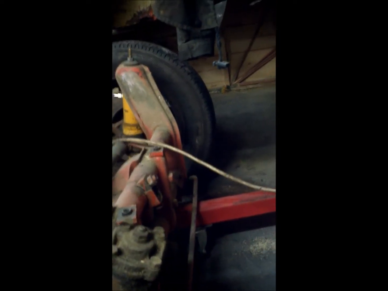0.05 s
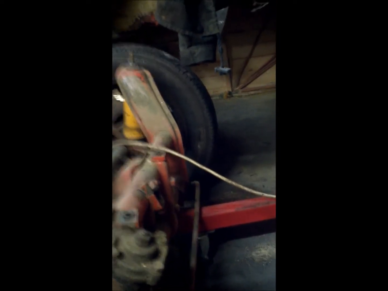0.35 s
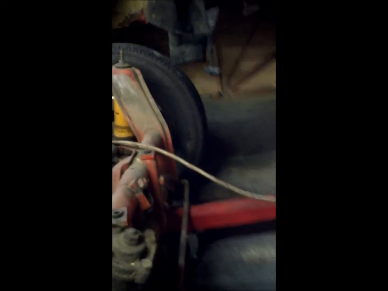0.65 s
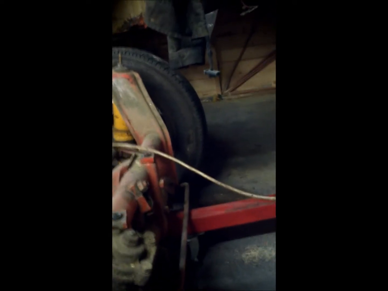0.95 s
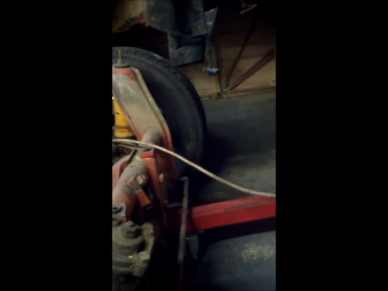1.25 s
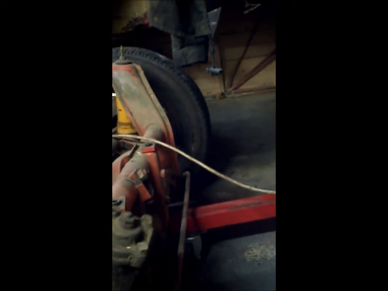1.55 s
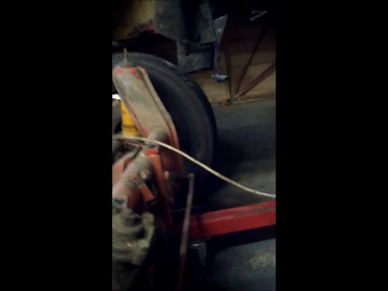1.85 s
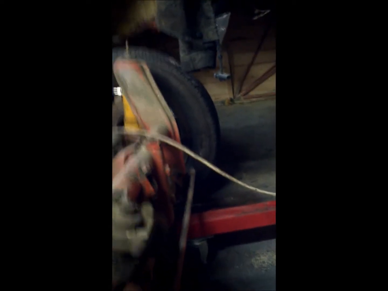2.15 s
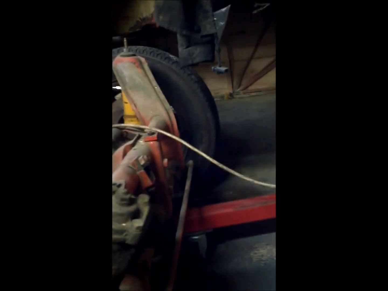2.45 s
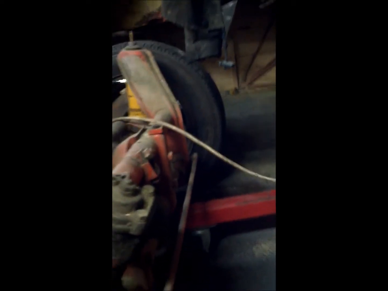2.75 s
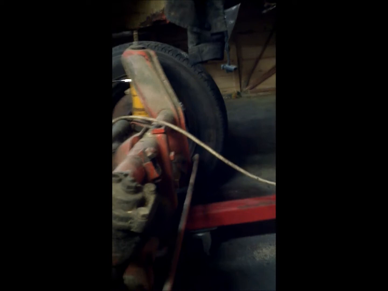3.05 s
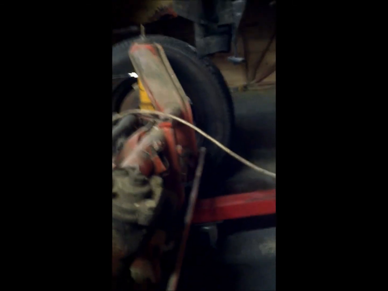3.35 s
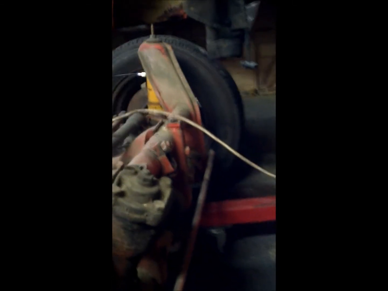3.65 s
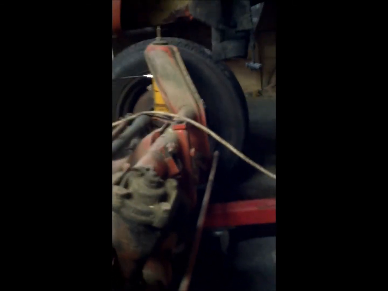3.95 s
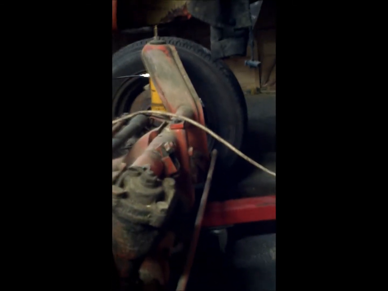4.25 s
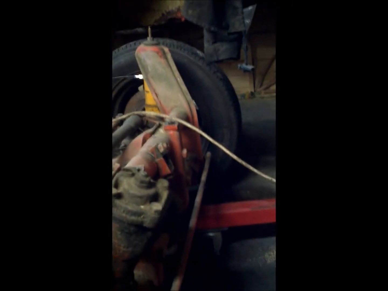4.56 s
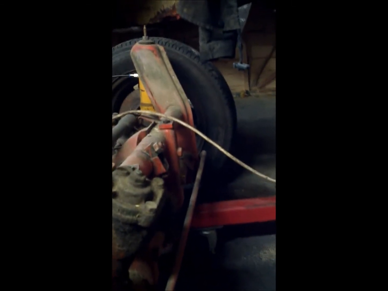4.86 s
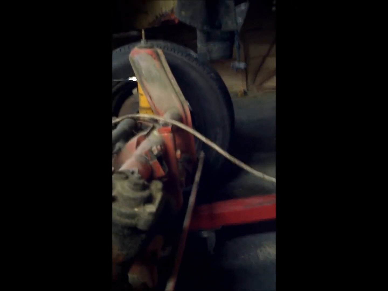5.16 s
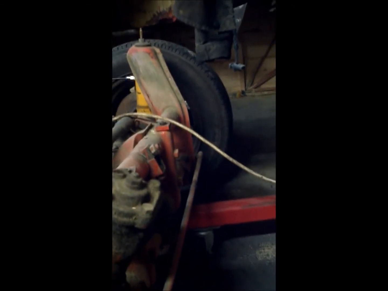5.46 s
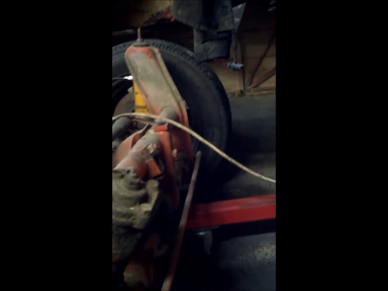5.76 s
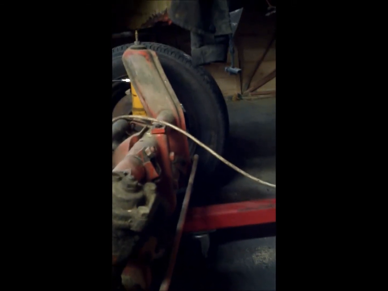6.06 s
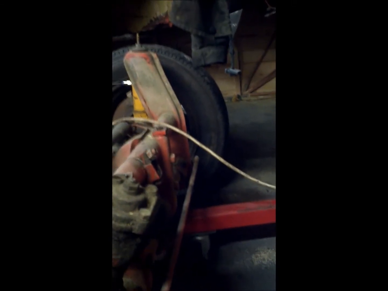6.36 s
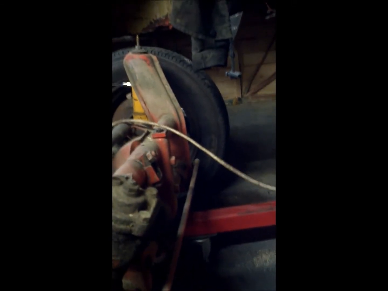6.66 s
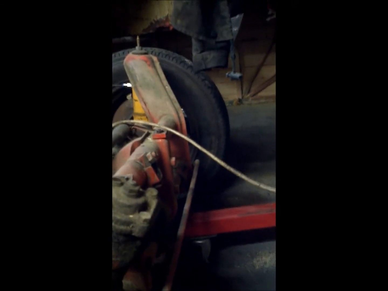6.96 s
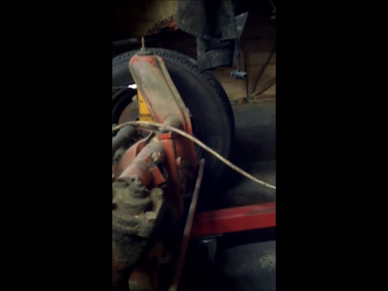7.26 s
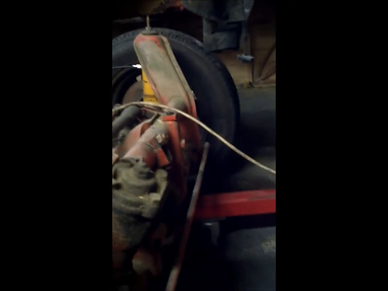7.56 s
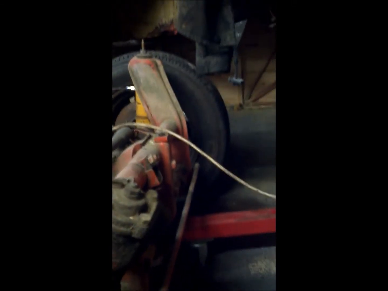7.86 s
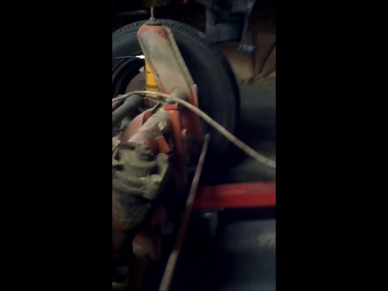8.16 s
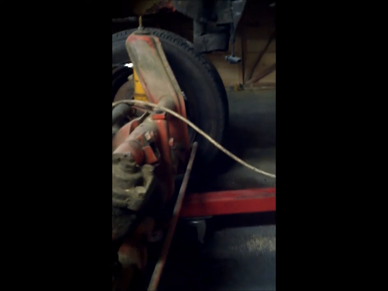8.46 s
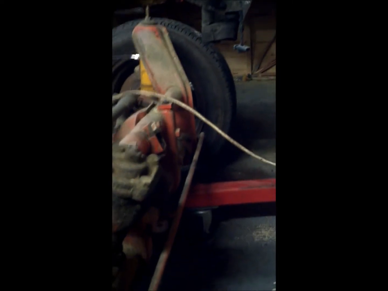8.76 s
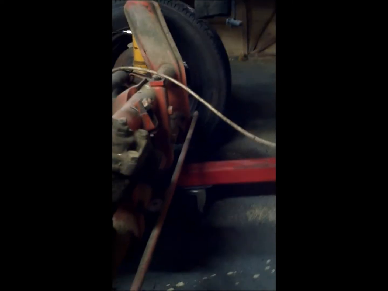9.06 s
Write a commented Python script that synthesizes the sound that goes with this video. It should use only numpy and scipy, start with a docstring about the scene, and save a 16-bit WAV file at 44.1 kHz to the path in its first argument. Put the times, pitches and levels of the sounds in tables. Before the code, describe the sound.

Compressed air suddenly starts rushing through a hose and valve in a garage, a bright, steady hiss with a faint wavering whistle. It eases a little, then the valve snaps shut with a sharp click, leaving a softer leak. Fittings knock lightly and the hose scrapes faintly over metal before a short, loud blast ends the flow. The microphone is close.

```python
"""A faint hiss, then a sudden rush of compressed air through a hose and valve in a garage.
The swirling air hisses, and whistles over an edge in the valve while it is forceful. It eases off,
then the valve snaps shut with a sharp click, leaving a softer leak. The hose scrapes over metal,
fittings knock, and a last blast escapes. A phone close by makes stereo from two microphone openings."""
import sys
import numpy as np
from scipy import signal
from scipy.fft import rfft, irfft, next_fast_len
from scipy.io import wavfile
from scipy.ndimage import map_coordinates

SR = 44100
rng = np.random.default_rng(int(sys.argv[2]) if len(sys.argv) > 2 else 0)


def transcribe(signal):
    """Save signal, clipped to [-1, 1], as a 16-bit WAV file at the path in sys.argv[1]."""
    frames = np.atleast_2d(signal).T
    limited = np.clip(frames, -1, 1)
    pcm = np.round(limited * 32767).astype(np.int16)
    wavfile.write(sys.argv[1], SR, pcm)


N = 411012
# The valve opens, eases off, snaps shut and is forced again; then the jet stops.
OPEN_S, EASE_S, SHUT_S, FORCE_S, STOP_S = .524, 4.51, 7.375, 9.1, 9.29


def amp(db):
    """Turn decibels into a number to multiply a sound by."""
    return 10 ** (np.asarray(db) / 20)

def clock():
    """The time of every sample, in seconds."""
    return np.arange(N) / SR

def along(points, hz):
    """Read between (frequency, value) points, giving each octave equal room."""
    freqs, values = np.transpose(points)
    return np.interp(np.log(hz + 1), np.log(freqs + 1), values)

def curves(rows):
    """Join a table's rows with straight lines: one curve for each column after the time."""
    times, *columns = np.transpose(rows)
    return [np.interp(clock(), times, column) for column in columns]

def gate(start, end, edge):
    """1 from start to end and 0 outside, with slopes lasting edge seconds."""
    return np.clip(np.minimum(clock() - start, end - clock()) / edge + .5, 0, 1)

def wobble(rate):
    """A smooth curve through rate random values a second."""
    t = clock()
    coarse = t[::32]
    values = rng.standard_normal(int(N * rate / SR) + 4)
    return np.interp(t, coarse, map_coordinates(values, [coarse * rate], order=2))

def add(track, start, sound):
    """Mix a sound into a track, start seconds in."""
    slot = track[..., round(start * SR):][..., :sound.shape[-1]]
    slot += sound[..., :slot.shape[-1]]

def filtered(x, response):
    """Scale and delay each frequency of x as response(hz) says."""
    size = next_fast_len(N + 2048, True)
    return irfft(rfft(x, size) * response(np.fft.rfftfreq(size, 1 / SR)), size)[..., :N]

def resonances(modes, hz):
    """How strongly an object answers each frequency, given the pitches it rings at."""
    return np.sqrt(sum(amp(db) ** 2 * (hz * width) ** 2 / ((pitch ** 2 - hz ** 2) ** 2 + (hz * width) ** 2)
                       for pitch, width, db in modes))

# Stereo width, the two openings' difference against their sum: f/Hz, level/dB
STEREO_WIDTH = [(100, 7), (500, 4), (1000, 2), (2500, 2), (4500, 0), (6000, -3), (8500, -4.5), (12000, -4),
                (15000, -3.5)]
def noise(gain, wide_db=0):
    """Noise shaped by gain(hz) at both openings; the part they share has an average (rms) size of 1."""
    grid = np.fft.rfftfreq(8192, 1 / SR)
    gains = gain(grid), gain(grid) * amp(along(STEREO_WIDTH, grid) + wide_db)
    white = rng.standard_normal((2, N))
    mid, side = filtered(white, lambda hz: np.array([np.interp(hz, grid, g) for g in gains]))
    return np.array([mid + side, mid - side]) / np.std(mid)

def smooth_noise(colour, wide_db=0):
    """Noise with a smooth tone colour: a table of how strong each frequency is."""
    return noise(lambda hz: amp(along(colour, hz)), wide_db)


# Loudness of the low rush of air and garage: t/s, level/dB
RUSH_LEVELS = [(0.45, -65), (0.7, -61), (1.05, -65), (2.6, -55.5), (4.1, -53.5), (5.2, -54.5), (6.5, -53),
               (7.3, -52.5), (7.5, -61), (8.45, -52.5), (8.75, -57), (9.2, -55.5)]
# Tone colour of that rush: f/Hz, level/dB
RUSH_COLOUR = [(30, -33), (60, -30), (105, -1), (280, 3.5), (500, 1), (900, -2.5), (1500, -2.5), (2200, -4),
               (5000, -47), (9000, -42)]
# Tone colour of seeping air: f/Hz, level/dB
SEEP_COLOUR = [(100, -25), (2000, -15.5), (3000, -15), (5000, -2.5), (6400, 1.5), (8000, -4), (12000, -2),
               (14500, -3), (15500, 4)]
# Tone colour of rumble and dull thumps: f/Hz, level/dB
THUMP_COLOUR = [(30, -16), (65, -2), (115, 6), (190, 0), (400, -17), (1500, -36)]
def background():
    """A low rush, air always seeping from the line, and the lumpy rumble of the hand on the phone."""
    rush_db, = curves(RUSH_LEVELS)
    rumble_db = -67.5 + 1.3 * (rush_db - rush_db.mean())
    rush = amp(rush_db + 0.8 * wobble(16)) * smooth_noise(RUSH_COLOUR)
    seep = amp(-46) * smooth_noise(SEEP_COLOUR)
    rumble = amp(rumble_db + 3.5 * wobble(12)) * smooth_noise(THUMP_COLOUR, wide_db=-20)
    return rush + seep + rumble

# Slides of the hose: t/s, length/s, level/dB
HOSE_SLIDES = [(5.9, 0.95, -61), (7.886, 0.83, -55.5)]
def scrapes(ring_hz=1410, width_hz=450, rough_db=1):
    """The hose slips unevenly over metal: each stroke swells and fades around one broad pitch."""
    strokes = np.zeros(N)
    for start, length, db in HOSE_SLIDES:
        add(strokes, start, amp(db) * np.sin(np.linspace(0, np.pi, round(length * SR))))
    rub = noise(lambda hz: resonances([(ring_hz, width_hz, 0)], hz) ** 2)
    return strokes * amp(rough_db * wobble(60)) * rub

# Pitches the fittings ring at: f/Hz, width/Hz, level/dB
FITTING_RINGS = [(238, 190, 6.5), (487, 54, 0), (860, 330, -20.5), (1480, 640, -2)]
# Each knock, and at 7.3722 s the low body of the valve's snap: t/s, level/dB, fade/s (the time to fall by 60
# dB), thump level/dB
FITTING_KNOCKS = [(2.528, -44, .25, -48), (2.744, -43, .05, -60), (2.953, -46, .14, -47),
                  (4.493, -52, .12, -62), (6.63, -50, .15, -50), (7.3722, -32, .005, -52),
                  (7.59, -62, .1, -53), (7.8052, -37.5, .045, -32), (8.136, -51, .1, -62),
                  (8.38, -49, .12, -60), (8.412, -48, .08, -62)]
def knocks():
    """Hose and fittings knock: a brief hard contact, a longer scuff and a low thump. One short row instead
    gives the valve's snap its low body."""
    scuff, thump = np.zeros((2, N))
    t = np.arange(SR // 4) / SR
    contact = 1 + 1.3 * amp(-60 * t / .025)
    for start, db, fade_s, thump_db in FITTING_KNOCKS:
        add(scuff, start, amp(db - 60 * t / fade_s) * contact)
        add(thump, start, amp(thump_db - 60 * t / .14))
    fitting = noise(lambda hz: resonances(FITTING_RINGS, hz) / np.hypot(1, hz / 3500))
    return scuff * fitting + thump * smooth_noise(THUMP_COLOUR, wide_db=-17)

# The open valve's high fizz and the hiss of its narrow throat: t/s, fizz level/dB, throat level/dB
OPEN_LEVELS = [(0.53, -31, -32), (0.6, -40.5, -32.5), (0.8, -41, -34.5), (0.88, -34.5, -29.5),
               (1.03, -36.5, -31), (1.12, -35.5, -26.5), (1.88, -34, -31.5), (2.25, -35, -36.5),
               (2.42, -33, -32), (2.88, -31, -32.5), (3.1, -30, -31.5), (3.52, -29.5, -32.5),
               (4.45, -31.5, -35.5), (4.6, -33.5, -39), (4.74, -31, -36.5), (4.92, -34, -40.0),
               (5.75, -32.5, -39.5), (6.05, -33.5, -40), (6.35, -31.5, -38.5), (7.36, -33.5, -40.0)]
# The leak past the shut valve, growing towards the last blast: t/s, fizz level/dB
LEAK_LEVELS = [(7.38, -40.5), (7.8, -40.5), (8.13, -36.5), (8.28, -40.5), (8.66, -35), (8.85, -36),
               (9.08, -34.5), (9.24, -21.5)]
def flow_levels(leak_throat_db=-7.5):
    """How loud fizz and throat are, in dB: first with the valve open, then as it leaks."""
    leak_db, = curves(LEAK_LEVELS)
    return np.where(clock() < SHUT_S, curves(OPEN_LEVELS), [leak_db, leak_db + leak_throat_db])

def flowing():
    """Air flows from the opening of the valve until the last blast."""
    return gate(OPEN_S, STOP_S, edge=0.001)

# Pitches the hollow hose rings at: f/Hz, width/Hz, level/dB
HOSE_RINGS = [(1107, 31, -2.5), (1702, 170, 2), (2276, 530, 1.5), (2400, 130, -10.5), (3440, 92, 6.5),
              (3930, 9.1, 9.5)]
# Tone colour of the hiss along the hose wall: f/Hz, level/dB
WALL_COLOUR = [(1500, -16), (2800, -43), (3700, 2), (4500, 4.5), (5300, 9), (6200, 1), (7500, -13)]
# Swells of that hiss: middle t/s, length/s, boost/dB
WALL_SWELLS = [(1.5, 0.6, 1.5), (4.75, 0.68, 2.5), (6.3, 0.64, 5), (9.21, 0.12, 7)]
def hose(forceful_db=-19, eased_db=-27.5):
    """The flow rings the hollow hose and hisses along its wall; the ring fades when the flow eases."""
    fizz_db, throat_db = flow_levels()
    ring_db = fizz_db + np.interp(clock(), [EASE_S - .2, EASE_S + .2], [forceful_db, eased_db])
    swell_db = sum(db * np.exp(-(2 * (clock() - middle) / length) ** 2)
                   for middle, length, db in WALL_SWELLS)
    wall_db = -50 + 0.27 * (throat_db - throat_db.mean()) + swell_db
    ring = noise(lambda hz: resonances(HOSE_RINGS, hz) / np.hypot(1, (hz / 4500) ** 2), wide_db=4.5)
    wall = amp(wall_db + 1.74 * wobble(25)) * smooth_noise(WALL_COLOUR)
    return flowing() * (amp(ring_db) * ring + wall)

# Each whistle: t/s, length/s, first f/Hz, last f/Hz, sag/Hz, level/dB, waver/fraction of the pitch
VALVE_WHISTLES = [(.57, 0.11, 940, 880, 0, -54, 0.03), (.63, 0.15, 881, 930, 62, -47.5, .015),
                  (.79, .11, 960, 630, 6, -56, 0.1), (1.25, .1, 1300, 1010, 0.5, -59, .04),
                  (1.337, .08, 1040, 1340, 0, -60, 0.06), (1.399, 0.16, 1340, 1000, 49.5, -58, 0.02),
                  (1.54, .21, 925, 920, 19, -47.5, .006), (1.68, 0.3, 915, 916, -0.5, -52.5, 0.02),
                  (1.991, 0.19, 885, 912, 4, -48, .025), (2.141, 0.37, 930, 893, -0.5, -58, 0.03),
                  (2.5, 1.79, 1152, 1142, 0, -59.5, .04), (3.98, 0.61, 880, 834, 10, -58.5, 0.03)]
def whistles(rough_db=1.6):
    """Air whistles unsteadily over an edge in the valve, gliding in pitch; most sag where loudest."""
    tone, unsteady = np.zeros(N), wobble(130)
    for start, length, first_hz, last_hz, sag_hz, db, waver in VALVE_WHISTLES:
        progress = np.linspace(0, 1, round(length * SR))
        swell = np.abs(np.sin(np.pi * progress)) ** 0.71  # a power below 1 makes the arch fuller
        glide_hz = first_hz + (last_hz - first_hz) * progress - sag_hz * swell
        hz = glide_hz * (1 + waver * unsteady[round(start * SR):][:len(progress)])
        add(tone, start, amp(db) * swell * np.sin(2 * np.pi * np.cumsum(hz) / SR))
    return tone * amp(rough_db * wobble(45)) * np.array([[1.8], [.2]])  # mostly at one opening

# Pitches the valve rings at: f/Hz, level/dB, fade/s
VALVE_RINGS = [(3200, -16, .003), (4200, -14, .0025), (6550, 1, .0033), (6900, 0, .0033),
               (10400, -13, .0025), (13400, -12, .0025)]
# Each snap: t/s, ring level/dB, crack level/dB
VALVE_SNAPS = [(7.3722, 11, -12.5), (7.5455, -23, -29), (7.8052, -20, -21), (7.8433, -11, -21)]
def snaps(rise_s=.0006, crack_fade_s=.007):
    """The valve snaps: a few tones that die almost at once, and a short crack of noise."""
    clicks, t = np.zeros((2, N)), np.arange(SR // 20) / SR
    tones = sum(amp(db - 60 * t / fade_s) * np.sin(2 * np.pi * hz * t) for hz, db, fade_s in VALVE_RINGS)
    swell = 1 - np.exp(-(t / rise_s) ** 2)
    ring = swell * tones * np.array([[1.3], [.7]])
    for start, ring_db, crack_db in VALVE_SNAPS:
        crack = amp(-60 * t / crack_fade_s) * rng.standard_normal((2, len(t)))
        add(clicks, start, amp(ring_db) * ring + amp(crack_db) * crack)
    return clicks

# Pitches the nozzle rings at: f/Hz, width/Hz, level/dB
NOZZLE_RINGS = [(7460, 50, -3), (7710, 50, -3), (8319, 40, -1), (9119, 35, -1), (9480, 35, -2),
                (9970, 50, 0), (10364, 40, 0), (10523, 35, 2), (11100, 90, -2), (11370, 90, -2),
                (12245, 35, 1), (12560, 60, -1), (13100, 50, -2), (13740, 90, -2), (14400, 40, -2)]
def nozzle(colour, ring, wide_db=0):
    """Swirling air hisses and also sets the nozzle ringing at high, narrow pitches."""
    return noise(lambda hz: amp(along(colour, hz)) * np.hypot(1, ring * resonances(NOZZLE_RINGS, hz)),
                 wide_db)

# Tone colour of a puff's bright spray: f/Hz, level/dB
SPRAY_COLOUR = [(200, -47), (1500, -8), (3000, -7), (5000, 2.5), (7000, 7), (11000, 8.5), (14000, 5.5),
                (15500, 0.5)]
# Tone colour of its gust hitting the phone: f/Hz, level/dB
GUST_COLOUR = [(30, -10), (100, 1.5), (280, -0.5), (500, -2.5), (900, -7), (1600, -7.5), (3000, -16),
               (7000, -51)]
# Each puff: t/s, level/dB, rise/s, hold/s, fade/s, gust compared with spray/dB
AIR_PUFFS = [(0.5215, -35, .002, 0.013, .12, -45), (0.565, -33, .002, .003, 0.044, -23),
             (0.842, -40, .008, .04, .15, -30), (9.236, -23.5, 0.0096, 0.013, 0.12, -12),
             (9.253, -12.5, 0.0031, 0.012, 0.14, -9)]
def puffs():
    """Air escapes suddenly, spraying a bright hiss and hitting the microphone openings in lumps."""
    spray_level, gust_level = np.zeros((2, N))
    t = np.arange(SR // 4) / SR
    for start, db, rise, hold, fade_s, gust_db in AIR_PUFFS:
        fall_db = 60 * np.maximum(t - rise - hold, 0) / fade_s
        push = np.clip(t / rise, 0, 1) * amp(db - fall_db)
        add(spray_level, start, push)
        add(gust_level, start, push * amp(gust_db))
    lumps = amp(2.5 * wobble(400))
    spray = spray_level * nozzle(SPRAY_COLOUR, ring=1.0, wide_db=-2.5)
    gust = gust_level * smooth_noise(GUST_COLOUR, wide_db=-1.0)
    return lumps * (spray + gust)

# Tone colour of the jet's broad fizz: f/Hz, level/dB
FIZZ_COLOUR = [(2500, -42), (4000, -16.5), (5500, -19), (7000, -6.5), (9000, 1), (11000, 0), (13200, 3),
               (14600, 1), (15100, -8), (16000, -8.5)]
# Tone colour of the hiss in the valve's throat: f/Hz, level/dB
THROAT_COLOUR = [(3000, -39), (4800, -35), (5500, -27.5), (6200, 3.5), (6800, 6.5), (7400, 4.5), (8400, 2),
                 (9300, -7.5), (12000, -77)]
# Tone colour of the highest sizzle: f/Hz, level/dB
SIZZLE_COLOUR = [(13000, -52), (14100, 8), (14800, -8), (15300, 23), (15700, 18), (16200, -19)]
def jet(forceful_db=-0.5, eased_db=-9):
    """The jet hisses in three bands that flutter together; the sizzle sinks while the valve is eased."""
    fizz_db, throat_db = flow_levels()
    eased = gate(EASE_S, FORCE_S, edge=.1)
    sizzle_db = fizz_db + forceful_db * (1 - eased) + eased_db * eased
    fizz = amp(fizz_db) * nozzle(FIZZ_COLOUR, ring=1.3)
    throat = amp(throat_db + 0.63 * wobble(30)) * smooth_noise(THROAT_COLOUR)
    sizzle = amp(sizzle_db + 1.3 * wobble(16)) * smooth_noise(SIZZLE_COLOUR)
    flutter_db = .7 * wobble(18) + .3 * wobble(90)
    return flowing() * amp(flutter_db) * (fizz + throat + sizzle)


def short_echoes(hiss, echo_db=-14, fade_s=0.045):
    """Short echoes give the hiss a fine, uneven colour that drifts slowly at random."""
    t = np.arange(SR // 20) / SR
    tails = rng.standard_normal((2, len(t))) * amp(-60 * t / fade_s) * (t > .002)
    first, second = (signal.oaconvolve(hiss, [tail / np.linalg.norm(tail)], axes=1)[:, :N]
                     for tail in tails)
    drift = 1.37 * wobble(2.5)
    echo = np.cos(drift) * first + np.sin(drift) * second
    return (hiss + amp(echo_db) * echo) / np.hypot(1, amp(echo_db))

def scene():
    """All the sounds as they reach the two microphone openings."""
    hiss = short_echoes(jet() + hose())
    return hiss + whistles() + puffs() + knocks() + scrapes() + snaps() + background()

def record(dry, delay_s=15 / SR, top_hz=15780):
    """The phone makes stereo by taking from each opening a delayed copy of the other."""
    def notches(hz, sign, evenness):
        """Some frequencies cancel; evenness flattens the level between them."""
        delayed = sign * np.exp(-2j * np.pi * hz * delay_s)
        return (1 - delayed) / (1 - evenness * delayed) * (1 + evenness) / 2
    mid = filtered((dry[0] + dry[1]) / 2, lambda hz: notches(hz, sign=1, evenness=0.29))
    side = filtered((dry[0] - dry[1]) / 2, lambda hz: notches(hz, sign=-1, evenness=0.0067))
    stereo = np.clip([mid + side, mid - side] * amp([[-.2], [.2]]), -1, 1)
    return filtered(stereo, lambda hz: np.clip((top_hz - hz) / 100 + .5, 0, 1))  # cut the highest treble


dry = scene()
out = record(dry)
transcribe(out)
```